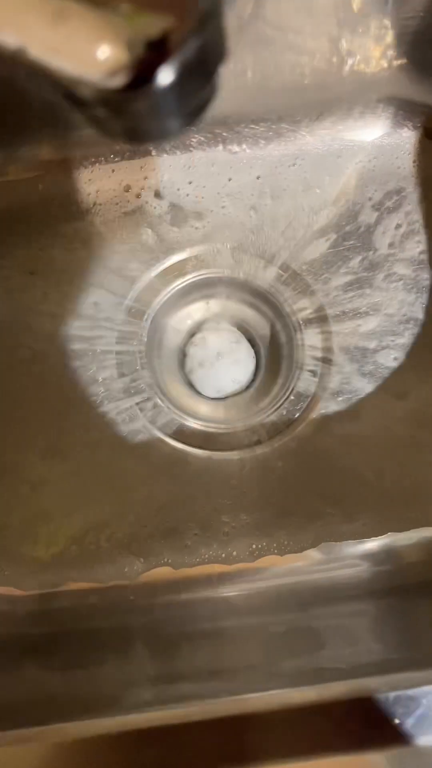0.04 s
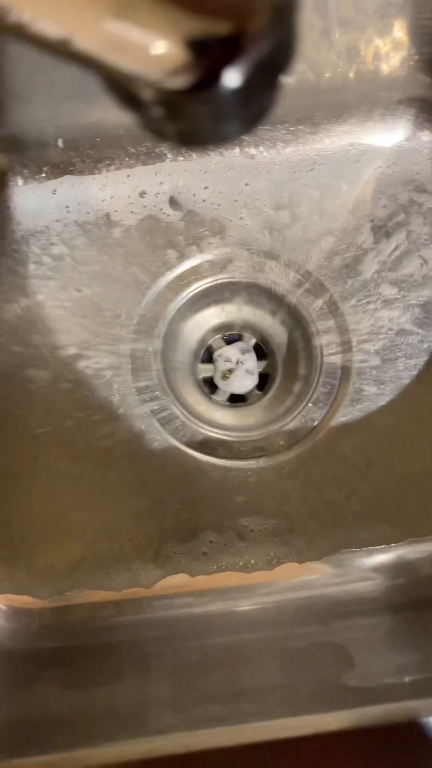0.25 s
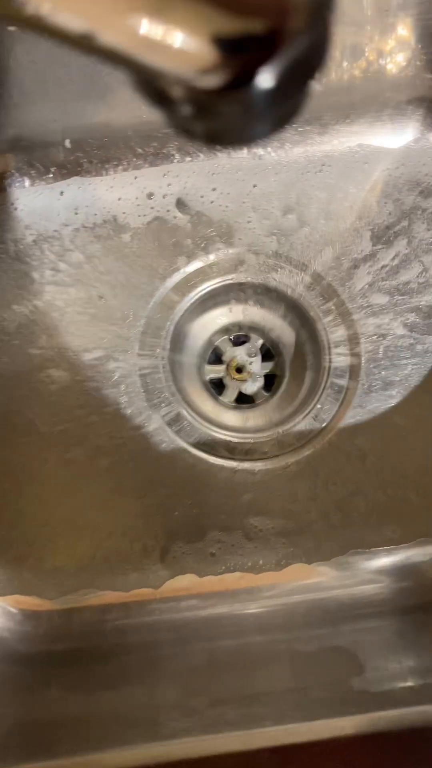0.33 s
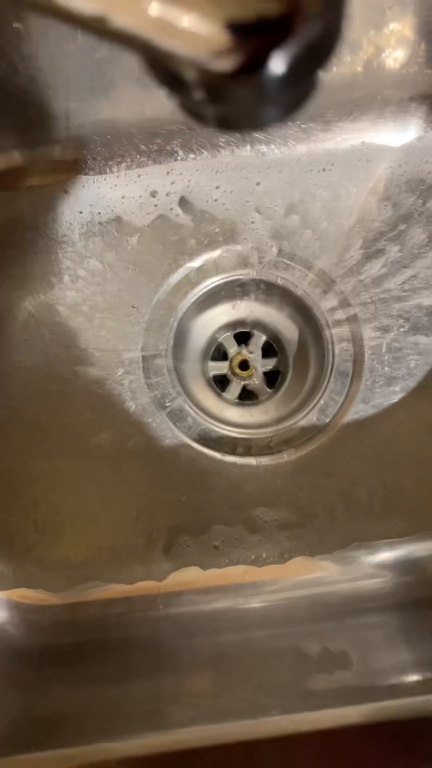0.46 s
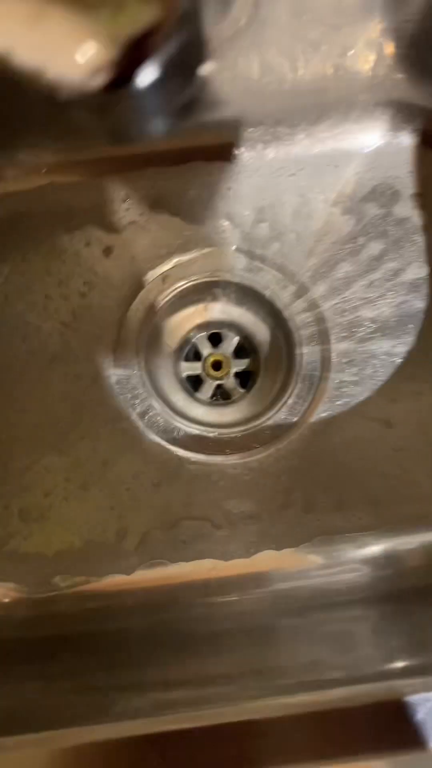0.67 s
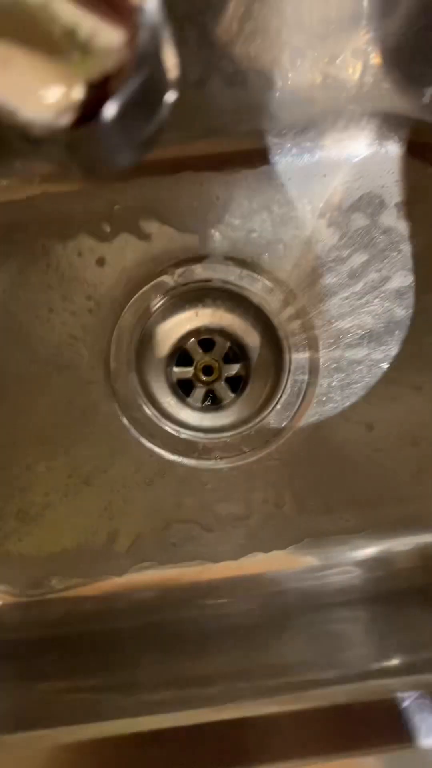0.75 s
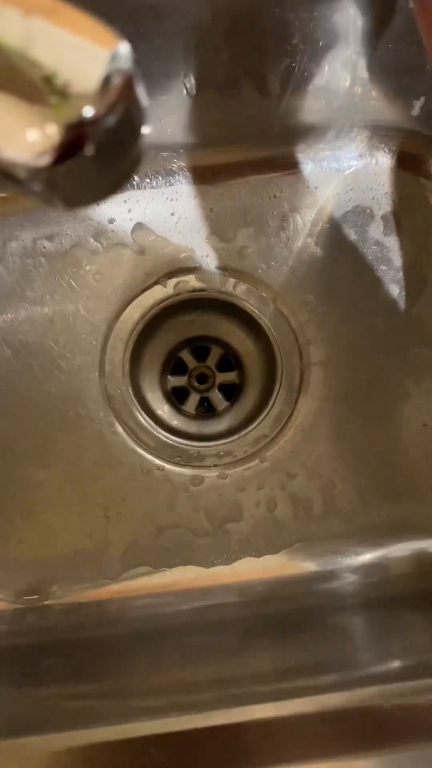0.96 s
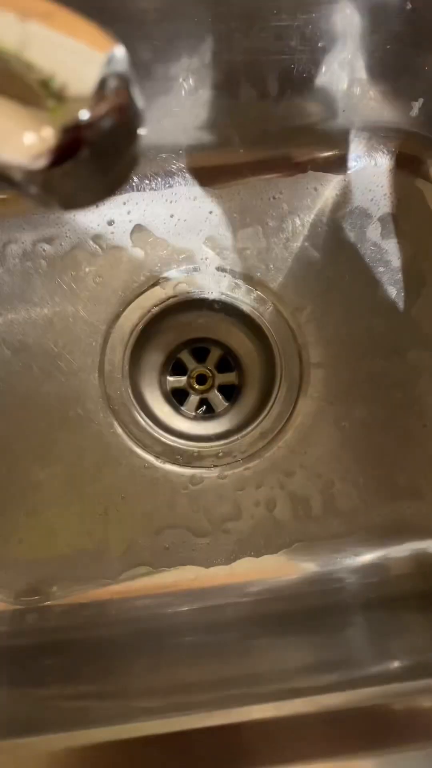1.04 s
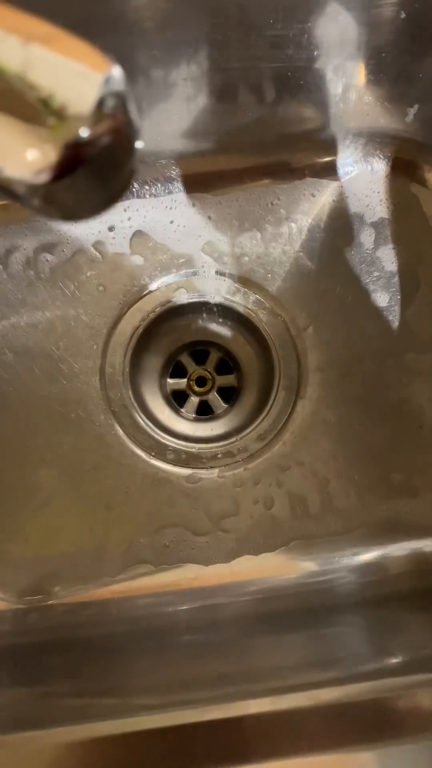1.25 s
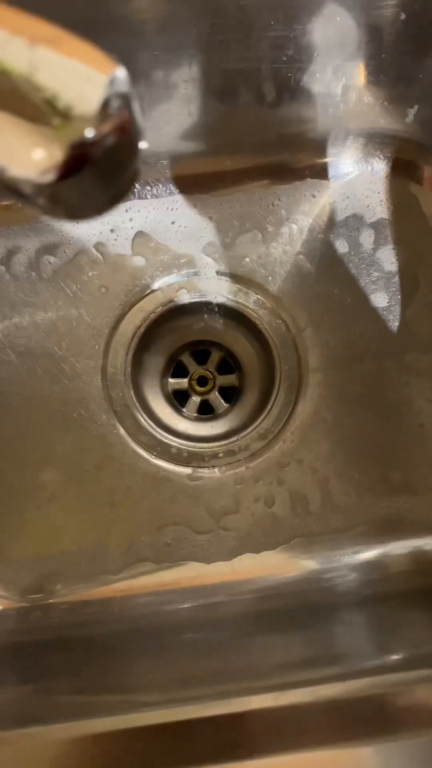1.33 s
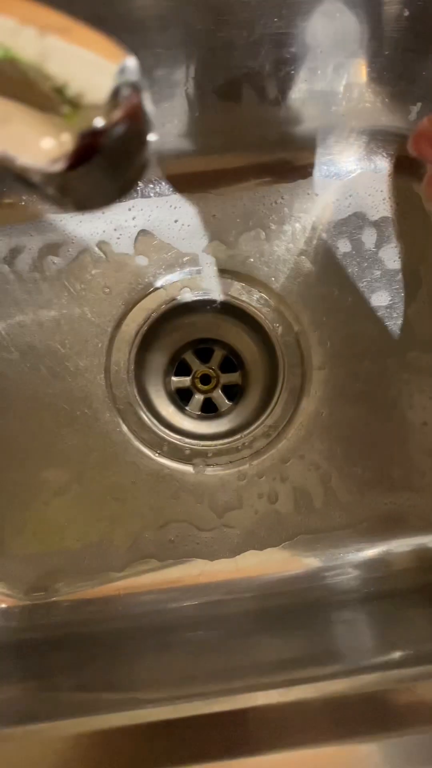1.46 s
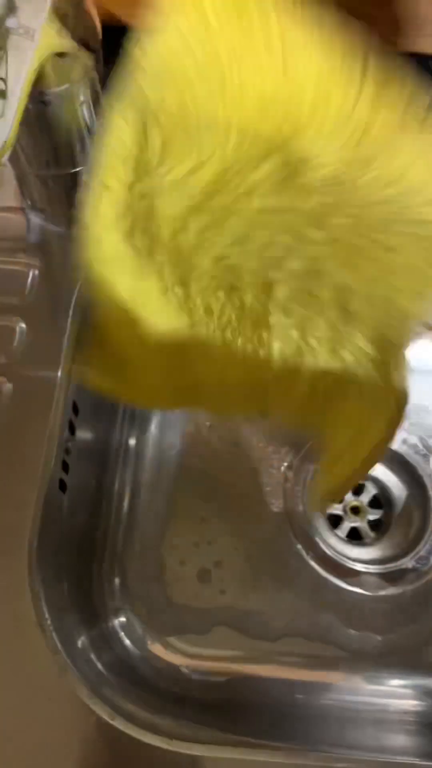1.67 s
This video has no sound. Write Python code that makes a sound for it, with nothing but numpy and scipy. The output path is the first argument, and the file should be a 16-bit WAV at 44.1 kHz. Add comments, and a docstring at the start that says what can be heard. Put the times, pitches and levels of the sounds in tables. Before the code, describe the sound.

Water gurgles down the drain of a steel kitchen sink, heard from just above. Low, hollow gulps and thumps build, with sharp slurps and a light metal clink, then thin out until a faint click cuts them off.

```python
"""A kitchen, just above a steel sink, as the last water runs out. Air gulps through the drain in short low
notes that set the basin booming, and slugs of water thump into the trap (the bend under the sink). Films of
water burst in the pipe mouth, drops tick, the strainer clinks once, and the gulps thin out. At a dry click the
scene changes: the draining stops dead, leaving a quiet room and two soft bumps."""
import sys
import numpy as np
from scipy import signal
from scipy.fft import rfft, irfft
from scipy.io import wavfile
from scipy.ndimage import uniform_filter1d

SR = 44100
rng = np.random.default_rng(int(sys.argv[2]) if len(sys.argv) > 2 else 0)


def inscribe(sig):
    """Save sig as 16-bit PCM at rate SR to the path in sys.argv[1].

    A 1-D sig is mono; a 2-D sig holds one channel per row.
    Samples are clipped to [-1, 1] before scaling.
    """
    pcm = np.round(np.clip(np.atleast_2d(sig).T, -1, 1) * 32767)
    wavfile.write(sys.argv[1], SR, pcm.astype(np.int16))


N = 74970

# pockets of air gulping through the drain (time [s], pitch [Hz], level [dB])
GULPS = [(.223, 257.6, -19), (.224, 338, -25), (.224, 165, -23.5), (.237, 229, -26.5), (0.267, 337, -24),
         (0.269, 240, -28), (.309, 610, -33), (.313, 269.4, -13), (.326, 611, -27), (.33, 278.3, -11),
         (.355, 277, -17), (.404, 532, -24.5), (.406, 326.4, -16.5), (.408, 186, -22.5),
         (.416, 302.4, -11.5), (.444, 311, -23), (.457, 305, -17), (.467, 267.6, -15), (.469, 546, -26.5),
         (.493, 280, -13.5), (.502, 538, -18.5), (.508, 291, -16), (.520, 269.4, -5), (.546, 333.4, -14),
         (.566, 232.5, -11.5), (.606, 281, -7), (0.608, 196, -22), (.634, 390, -21), (.655, 338.6, -12),
         (.664, 299, -7), (.692, 323.5, -17), (.702, 292.3, -9.5), (.713, 313, -13.5), (.723, 424.4, -17.5),
         (.736, 356, -11.5), (.740, 457, -16), (.750, 322, -5.5), (.767, 308.7, -15.5), (.786, 328, -17.5),
         (0.805, 337, -20.5), (.820, 316.4, -25), (0.845, 281, -27.5), (.905, 327.5, -14.5),
         (.906, 422, -23), (1.006, 320, -26.5), (1.036, 330, -15), (1.042, 365, -15.5), (1.043, 467.6, -16),
         (1.096, 321, -21.5), (1.14, 406, -24), (1.154, 298.5, -15), (1.160, 315.3, -10),
         (1.161, 182, -19.5), (1.161, 466, -16), (1.184, 339, -19), (1.199, 332, -18), (1.211, 303, -16.5),
         (1.239, 462, -24), (1.291, 432, -27.5), (1.315, 331, -19.5), (1.330, 301.6, -24),
         (1.422, 438, -26), (1.435, 324, -29.5), (1.438, 486, -31.5)]
RISE_S = 0.00131  # how fast a burst, slurp or clink starts


def undb(db):
    """Turn decibels into a number to multiply by."""
    return 10 ** (np.asarray(db) / 20)


def unit(x):
    """Scale a sound to an average strength (rms) of 1."""
    return x / np.sqrt(np.mean(x ** 2))


def since(start):
    """Seconds since start, zero before it."""
    return np.maximum(np.arange(N) / SR - start, 0)


def fade(t, ring_s):
    """Die away by 60 dB over the ring time."""
    return np.exp(-np.log(1000) * t / ring_s)


def swell(start, rise, length):
    """Rise quickly, then die away; all three values are in seconds."""
    t = since(start)
    return (1 - np.exp(-(t / rise) ** 2)) * np.exp(-t / length)


def gains(points):
    """Join (frequency [Hz], level [dB]) points into a gain for every frequency."""
    hz, db = np.array(points).T
    frequencies = np.arange(N + 1) * SR / (2 * N)
    return undb(np.interp(np.log(frequencies + 1), np.log(hz), db))


def colour(x, points):
    """Give a sound its colour: how strong its low and high parts are."""
    return irfft(rfft(x, 2 * N) * gains(points))[..., :N]


def spread(pair, width):
    """Make left and right: the first signal is shared, the second pulls the sides apart."""
    return pair[0] + width * pair[1] * np.array([[1], [-1]])


def noise(points, width):
    """Coloured stereo noise."""
    return spread(unit(colour(rng.standard_normal((2, N)), points)), width)


def convolve(x, response):
    """Let every sample of x set off the given ring or echo."""
    return signal.fftconvolve(np.atleast_2d(x), np.atleast_2d(response), axes=1)[:, :N]


def room_hiss():
    """The quiet room hisses faintly and steadily."""
    # colour of the hiss (frequency [Hz], level [dB])
    hiss_colour = [(40, 12), (150, 10.5), (500, -3.5), (1500, -16), (4000, -4), (7000, -14), (10500, 4.5),
                   (15500, -8)]
    return undb(-73) * noise(hiss_colour, width=0.63)


def kitchen(x):
    """The basin walls and the room add a short echo; the drain lies to the right."""
    # how loud the left is compared with the right (frequency [Hz], level [dB])
    balance = [(100, -1), (200, -3), (320, -6.5), (480, -9.5), (650, -7), (900, -3), (2400, -0.5),
               (15000, -1)]
    echo_gap_s, left_lag_s = 0.021, 0.000038
    t = since(echo_gap_s)
    tail = rng.standard_normal((2, N)) * (t > 0) * fade(t, ring_s=0.41)
    echoing = x + undb(-15) * convolve(x, tail / np.linalg.norm(tail[0]))
    tilt = gains(balance)
    lag = np.exp(-1j * np.pi * np.arange(N + 1) * SR / N * left_lag_s)
    sides = np.array([tilt * lag, np.ones(N + 1)]) * 2 / (1 + tilt)
    return irfft(rfft(echoing, 2 * N) * sides)[:, :N]


def ending(click_s):
    """One dry click, then a faint fading hiss and two soft bumps."""
    # colours of the fading hiss and of the bumps (frequency [Hz], level [dB])
    hiss_colour = [(300, 6.5), (2000, 0.82), (4500, 10.5), (7000, 0.5), (10500, 13.7), (15500, 2.2)]
    bump_colour = [(30, -16), (80, 1.5), (200, -6.5), (450, -15.5), (900, -27.5), (2500, -32), (8000, -45)]
    # soft bumps (time [s], level [dB])
    bump_hits = [(1.634, -48), (1.671, -51)]
    pitch_hz, width_hz = 1074, 650
    t = since(click_s)
    click = (t > 0) * np.cos(2 * np.pi * pitch_hz * t) * np.exp(-np.pi * width_hz * t)
    click *= undb(-3) * width_hz * np.pi / SR
    hiss = undb(-57.5) * swell(1.56, 0.0031, 0.064) * noise(hiss_colour, width=0.97)
    bumps = sum(undb(db) * swell(s, 0.0029, 0.039) for s, db in bump_hits)
    return click + hiss + bumps * noise(bump_colour, width=0.26)


def pipe_hum():
    """The full pipe hums, fading and drifting in pitch, until the first gulp lets air in."""
    # tones of the hum (pitch [Hz], level [dB], ring time [s], pitch slide [Hz/s])
    tones = [(99, -44, 0.49, -1), (238.5, -41, 0.55, 55), (247.6, -42, 7.2, -13), (390, -42, 0.43, -280),
             (508, -52.5, .6, -130)]
    t, end_s = since(0), 0.23
    hum = sum(undb(db) * fade(t, ring_s) * np.sin(2 * np.pi * (hz + slide * t / 2) * t)
              for hz, db, ring_s, slide in tones)
    return np.clip((end_s - t) / 0.032, 0, 1) * hum


def running_water():
    """Water rumbles and churns in the pipe under a trickle of tiny drops."""
    # loudness of the flow (time [s], rumble [dB], churn [dB], trickle [dB])
    flow_levels = [(0, -37.5, -47, -64), (.2, -49.5, -49, -65.5), (.3, -35, -39, -62),
                   (.42, -33.5, -33.5, -57.5), (.51, -25, -24, -50.5), (.6, -39, -33, -47.5),
                   (.68, -31, -27, -49), (.8, -42, -34.5, -56.5), (.88, -41, -42.5, -57),
                   (1.1, -46, -46, -58.5), (1.219, -37.5, -33, -68), (1.36, -53, -43.5, -70.5),
                   (1.538, -48.5, -55.5, -81)]
    # colours of those three parts (frequency [Hz], level [dB])
    rumble_colour = [(22, -57.5), (38, -30), (48, -12.5), (60, -8.5), (78, -1.5), (88, 8.5), (102, 10),
                     (116, 2.5), (250, -56.5)]
    churn_colour = [(110, -1.5), (180, 0.5), (260, 2.5), (340, -6), (480, -5), (700, -34), (1500, -65)]
    trickle_colour = [(350, -9.5), (700, 12), (1400, 2.5), (2400, -8), (4800, -7.5), (7000, -22),
                      (11000, -15.5), (16000, -39.5)]
    drops_per_s, scatter_db = 3000, 0.7
    times, *levels = np.array(flow_levels).T
    rumble, churn, trickle = (undb(np.interp(since(0), times, db)) for db in levels)
    sizes = undb(scatter_db * np.minimum(rng.exponential(size=N), 5))
    drops = (rng.random(N) < drops_per_s / SR) * sizes * rng.standard_normal((2, N))
    return (rumble * noise(rumble_colour, width=0.06)
            + churn * noise(churn_colour, width=0.14)
            + trickle * spread(unit(colour(drops, trickle_colour)), width=0.91))


def droplet_snaps():
    """The finest droplets break with a bright snap that has no pitch."""
    # breaking droplets (time [s], level [dB])
    snaps = [(0.3902, -52.5), (0.4561, -45.5), (0.4982, -29), (0.8143, -48.5), (0.878, -55), (0.891, -48),
             (1.1172, -52.5), (1.1392, -46), (1.1862, -52), (1.2032, -50), (1.372, -55), (1.388, -61)]
    # colour of a snap (frequency [Hz], level [dB])
    snap_colour = [(1000, -5), (2000, 7.5), (5000, 3), (7000, -14.5), (10000, 8.5), (13000, 1.5),
                   (16000, -1.5)]
    loudness = sum(undb(db) * swell(s, 0.0001, 0.0018) for s, db in snaps)
    return loudness * noise(snap_colour, width=0.93)


def drop_ticks():
    """Each drop on the steel gives a few milliseconds of slightly rough, high ring."""
    # drops landing, some with several pitches (time [s], pitch [Hz], level [dB])
    ticks = [(.325, 2114, -37.5), (.566, 4300, -37.5), (.602, 1800, -31), (.603, 2340, -29),
             (.603, 3660, -37), (0.802, 2680, -39.5), (.878, 4580, -49.5), (.891, 4500, -45),
             (0.892, 2650, -48), (.905, 2340, -42), (0.952, 4670, -44.5), (0.961, 4330, -54),
             (0.961, 2720, -56), (.977, 4750, -45.5), (0.977, 2750, -43.5), (.994, 2740, -46.5),
             (1.073, 4720, -47.5), (1.096, 2680, -55), (1.112, 2700, -39.5), (1.437, 4370, -66)]
    width_hz = 88  # how much the random wander blurs each pitch
    wander = uniform_filter1d(np.cumsum(rng.standard_normal(N)), size=24)
    wander *= np.sqrt(2 * np.pi * width_hz / SR)
    return sum(undb(db + 0.5) * swell(s, 0.00071, 0.0029) * np.sin(2 * np.pi * hz * since(s) + wander)
               for s, hz, db in ticks)


def strainer_clink():
    """The strainer rings in clear tones while the steel around it shimmers briefly."""
    # tones of the strainer (pitch [Hz], level [dB], ring time [s])
    tones = [(2100, -16.5, 0.33), (2220, -12, 0.26), (2760, -19.5, .28), (2990, -18.5, 0.58),
             (3495, -8, 0.22), (3550, -5.5, 0.35), (3940, -18.5, 0.54), (4300, -13, .28),
             (4500, -17.5, 0.52), (4810, -15.5, .6), (4780, -13.5, 0.36), (5960, 2, 0.12), (5934, 3, 0.066)]
    # colour of the shimmer (frequency [Hz], level [dB])
    shimmer_colour = [(1500, -19), (2700, -12), (3400, 3), (4800, 3), (5400, -13), (6200, -6.5),
                      (7000, -34.5)]
    start_s = 0.647
    t = since(start_s)
    sides = np.array([[0.6], [-0.6]])  # radians: each tone reaches left and right out of step
    ring = sum(undb(db) * np.sin(2 * np.pi * hz * t + (-1) ** k * sides) * fade(t, ring_s)
               for k, (hz, db, ring_s) in enumerate(tones))
    shimmer = undb(-47) * swell(start_s, RISE_S, 0.035) * noise(shimmer_colour, width=4.7)
    return undb(-31) * (1 - np.exp(-t / RISE_S)) * ring + shimmer


def slurps():
    """Air tears through the strainer: a sharp crack and a hard splat topped by a brief fizz."""
    # hard slurps (time [s], splat level [dB], splat length [s], fizz level [dB])
    tears = [(0.4915, -17.5, 0.0039, -43), (0.496, -18, 0.015, -41), (0.647, -18.5, 0.014, -39.5)]
    # colours of the splat and of the fizz (frequency [Hz], level [dB])
    splat_colour = [(400, 9), (800, 5), (1500, 0), (2300, -5.5), (3300, -16.5), (5000, -16), (6500, -15),
                    (8000, -68), (15000, -38.5)]
    fizz_colour = [(2000, -21), (6000, -13.5), (7500, -7.5), (9500, 10.5), (12500, -3.5), (14000, -15.5),
                   (16000, -28.5)]
    splat = sum(undb(db) * swell(s, RISE_S, length) for s, db, length, _ in tears)
    fizz = sum(undb(db) * swell(s, RISE_S, 0.0074) for s, _, _, db in tears)
    crack = sum(undb(db - 1.5) * swell(s, 0.00008, 0.0013) for s, _, _, db in tears)
    return splat * noise(splat_colour, width=0.2) + (fizz + crack) * noise(fizz_colour, width=1.0)


def films(rows, pipe_tones, spray_colour):
    """Each bursting film pops and flutters, ringing the pipe mouth, and throws a short spray."""
    pipe = sum(undb(db) * np.sqrt(width) * np.sin(2 * np.pi * hz * since(0))
               * np.exp(-np.pi * width * since(0)) for hz, width, db in pipe_tones)
    pops, flutter, spray = np.zeros((3, N))
    for s, ring_db, spray_db, length in rows:
        shape = swell(s, RISE_S, length)
        pops[int((s + RISE_S) * SR)] += undb(ring_db - 6.5)
        flutter += undb(ring_db - 0.5) * shape
        spray += undb(spray_db - 3) * shape
    shaking = flutter * spread(rng.standard_normal((2, N)), width=0.66)
    flutter_ring = convolve(shaking, pipe / np.linalg.norm(pipe))
    pop_ring = convolve(pops, 2 * pipe / np.abs(pipe).max())
    return pop_ring + flutter_ring + spray * noise(spray_colour, width=0.28)


def pipe_bursts():
    """Films of water burst in the pipe mouth, ringing hollower once the water has left it."""
    # bursting films (time [s], ring level [dB], spray level [dB], length [s])
    bursts = [(0.128, -52, -77.5, 0.0073), (0.221, -52.5, -68, 0.026), (0.266, -46, -63, 0.01),
              (0.309, -39.5, -66, 0.0032), (.325, -38, -36, 0.002), (0.356, -47.5, -70.5, 0.0036),
              (0.399, -45.5, -51, 0.024), (0.44, -34, -50, 0.0061), (0.454, -37.5, -34.5, 0.012),
              (0.465, -23.5, -37, 0.0088), (0.503, -24, -46, 0.014), (0.547, -38.5, -44, 0.014),
              (0.601, -31.5, -46, 0.0066), (0.636, -27.5, -47, 0.0099), (0.697, -31, -40, 0.016),
              (0.733, -27.5, -53.5, 0.013), (0.785, -37, -49, 0.0047), (0.801, -38, -43, 0.0088),
              (0.903, -32, -39, 0.0055), (0.958, -44, -45, 0.0076), (0.99, -50, -44.5, 0.0052),
              (1.005, -43.5, -66, 0.0087), (1.04, -30.5, -46.5, 0.006), (1.094, -44.5, -56, 0.0046),
              (1.145, -38, -52, 0.0064), (1.152, -32, -43, 0.005), (1.158, -26, -36.5, 0.0053),
              (1.188, -41.5, -67, 0.013), (1.206, -44, -46.5, 0.0047), (1.215, -33, -66, .01),
              (1.235, -36, -62, 0.011), (1.277, -42, -58, 0.0057), (1.314, -37.5, -53, 0.0063),
              (1.4205, -42.5, -61, 0.0027), (1.434, -42.5, -54, 0.0063)]
    # tones of the flooded and open pipe; wider ones die sooner (pitch [Hz], width [Hz], level [dB])
    flooded_pipe = [(615.8, 12, 11), (876, 45, 3), (1039, 72, 9), (1188, 52, -1.5), (1362, 29, 0),
                    (1660, 88, -9.5), (2090, 80, -7), (2290, 74, -11), (2800, 37, -15.5)]
    open_pipe = [(621, 38, 7), (876, 140, 3), (1027, 51, 9), (1147, 34, -0.5), (1374, 60, -1.5),
                 (1894, 60, -1), (2719, 88, -2.5), (3980, 150, -17), (4600, 390, -22)]
    # colours of the spray, with the pipe flooded and open (frequency [Hz], level [dB])
    flooded_spray = [(500, -13), (1200, -23), (2200, 5.5), (3000, -11), (4700, -8), (6300, -22.5),
                     (10500, -19), (15500, -30.5)]
    open_spray = [(1000, -7), (1950, -4.5), (2300, -4.5), (2780, -2.5), (3300, -14.5), (4600, -0.5),
                  (6300, -28), (10500, -10.5), (15500, -26)]
    opens_s = 0.87
    early = [row for row in bursts if row[0] < opens_s]
    late = [row for row in bursts if row[0] >= opens_s]
    return films(early, flooded_pipe, flooded_spray) + films(late, open_pipe, open_spray)


def trap_thumps():
    """Slugs of water drop into the trap, each making a few deep swings."""
    # falling slugs of water (time [s], pitch [Hz], level [dB])
    slugs = [(0.234, 88, -32.5), (0.284, 102, -31.5), (0.359, 94.7, -24.5), (.462, 97.2, -13.5),
             (0.504, 109.3, -21), (.65, 98.7, -23), (.915, 103.2, -27), (1.045, 112.3, -26),
             (1.215, 117, -22), (1.31, 96.3, -32.5), (1.43, 110.8, -29)]
    return sum(undb(db) * swell(s, 0.0067, 0.023) * np.sin(2 * np.pi * hz * since(s))
               for s, hz, db in slugs)


def basin_boom():
    """Every gulp pushes the basin, which booms on."""
    # tones of the steel basin and the water in the trap (pitch [Hz], level [dB], ring time [s])
    tones = [(79.6, -17.5, 0.13), (100.8, 3, 0.16), (131.4, -7, 0.2), (178, -23.5, .1), (246.5, -9, 0.13),
             (322.4, -1, 0.18), (498, 4.5, 0.23), (563, -12.5, .14)]
    pushes, push_s = np.zeros(N), 0.0012
    for start, _, db in GULPS:
        age = since(start) / push_s
        pushes += undb(db) * age * np.exp(-age ** 2) * 2 / (push_s * SR)
    t = since(0)
    ring = sum(undb(db) * np.cos(2 * np.pi * hz * t) * fade(t, ring_s) for hz, db, ring_s in tones)
    return undb(-20.5) * convolve(pushes, ring)


def air_gulps():
    """Each air pocket swings a few times, rising a little in pitch, with a weaker, higher tone."""
    rise_s, slide_per_s, overtone_ratio = 0.0034, 1, 1.439
    out = np.zeros(N)
    for start, hz, db in GULPS:
        t = since(start)
        phase = 2 * np.pi * hz * t * (1 + slide_per_s * t / 2)
        tone = np.sin(phase) * fade(t, ring_s=0.045)
        overtone = undb(-16) * np.sin(overtone_ratio * phase) * fade(t, ring_s=0.035)
        onset = 1 - np.exp(-(t / rise_s) ** 2)
        out += undb(db + 6) * onset * (tone + overtone)
    return out


def scene():
    """The draining sound runs until a click, where it stops dead and a quieter room follows; the room hisses
    throughout."""
    t, click_s = since(0), 1.544
    fade_in = 1 - np.exp(-t / 0.0012)
    cut_off = np.clip((click_s - t) / 0.0034, 0, 1)
    drain = (pipe_hum() + air_gulps() + basin_boom() + trap_thumps() + pipe_bursts() + slurps()
             + drop_ticks() + droplet_snaps() + strainer_clink() + running_water())
    return fade_in * cut_off * kitchen(drain) + ending(click_s) + room_hiss()


def record(dry):
    """Two filters take away the deepest bass and the highest treble."""
    bottom_hz, top_hz = 36, 16300
    thinned = signal.sosfilt(signal.butter(4, bottom_hz, "high", fs=SR, output="sos"), dry)
    return signal.sosfilt(signal.ellip(8, 0.2, 70, top_hz, fs=SR, output="sos"), thinned)


dry = scene()
out = record(dry)
inscribe(out)
```